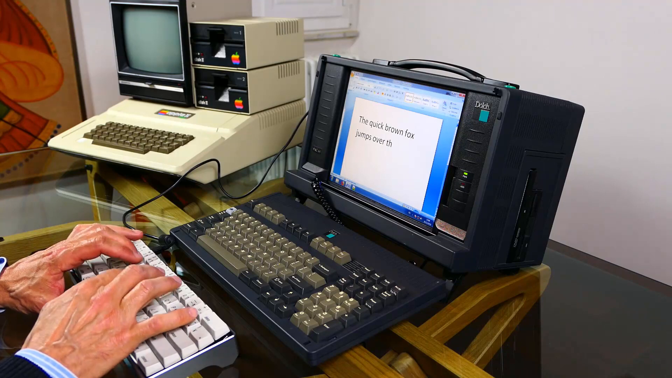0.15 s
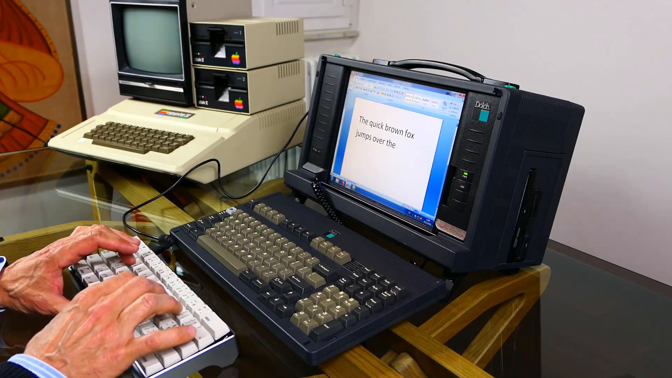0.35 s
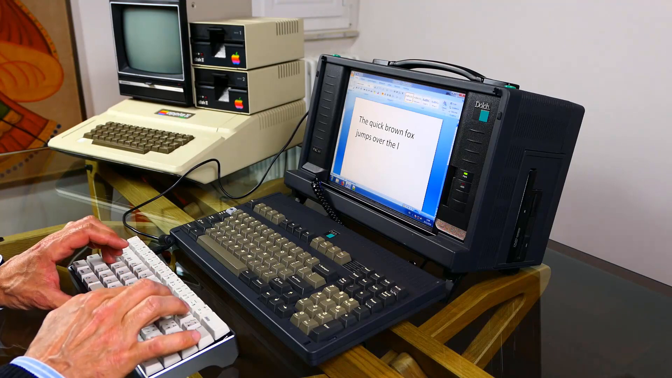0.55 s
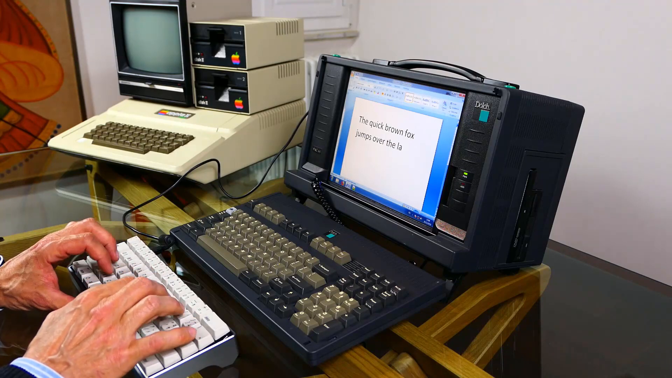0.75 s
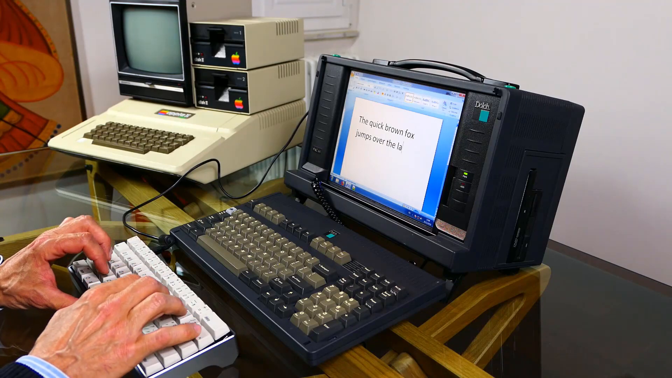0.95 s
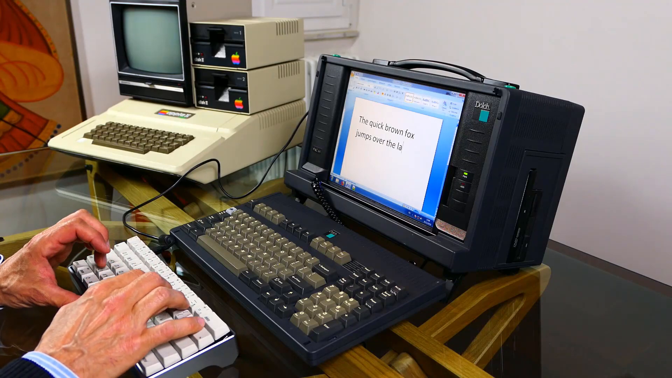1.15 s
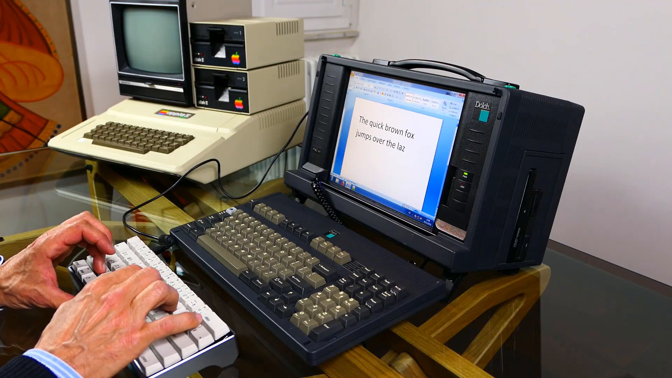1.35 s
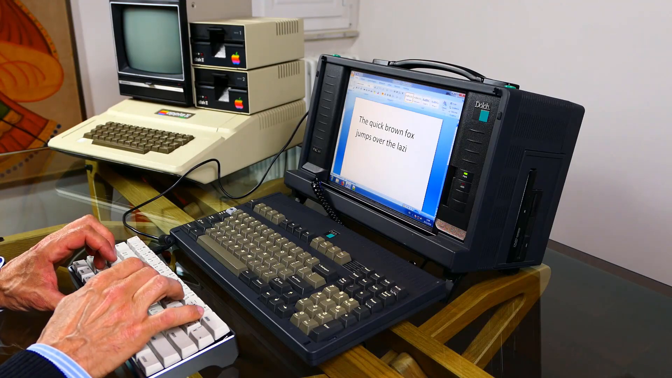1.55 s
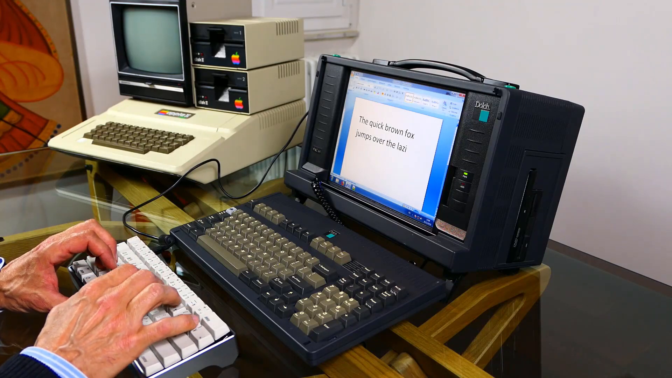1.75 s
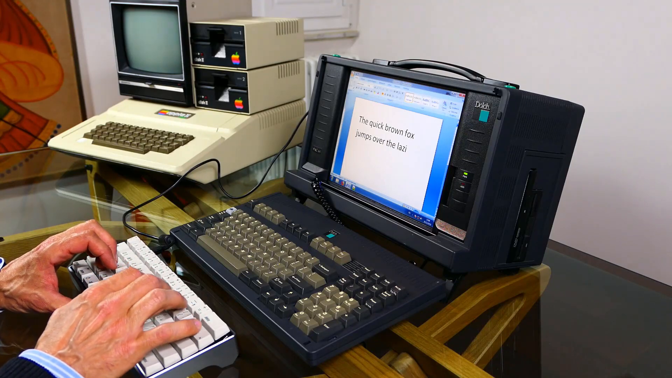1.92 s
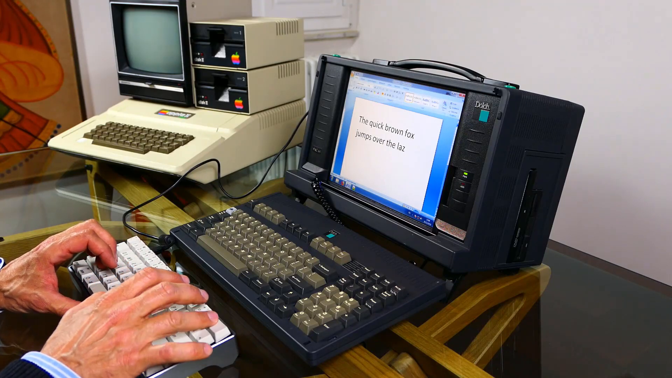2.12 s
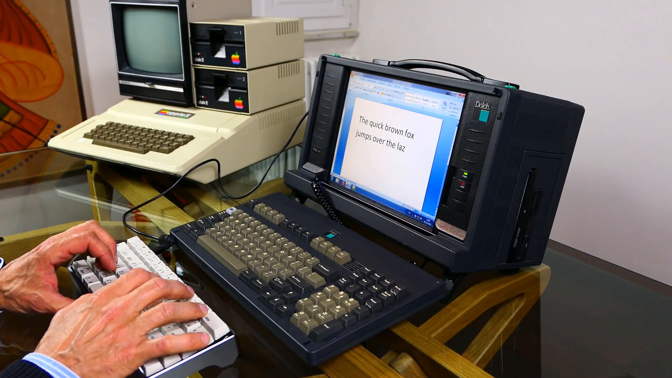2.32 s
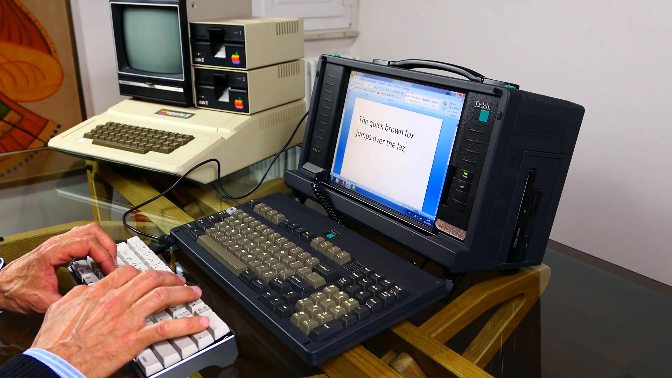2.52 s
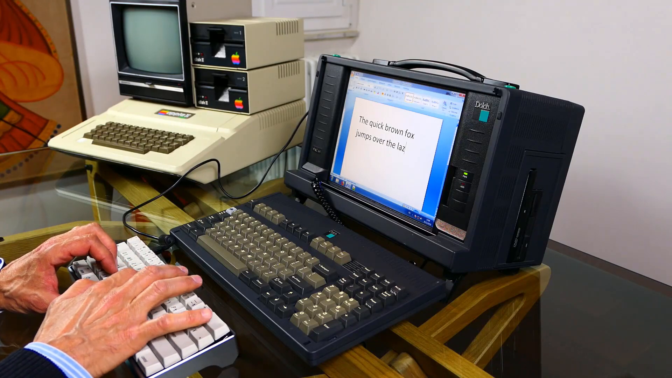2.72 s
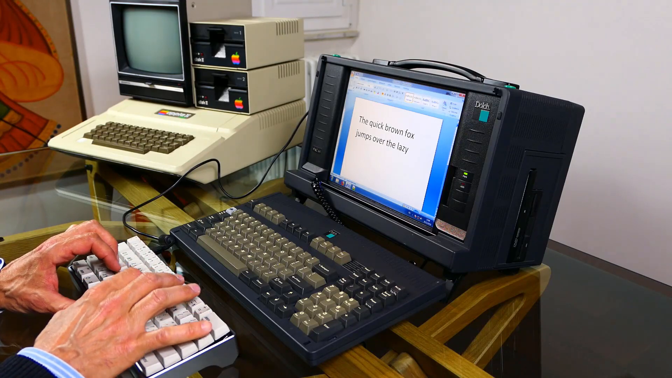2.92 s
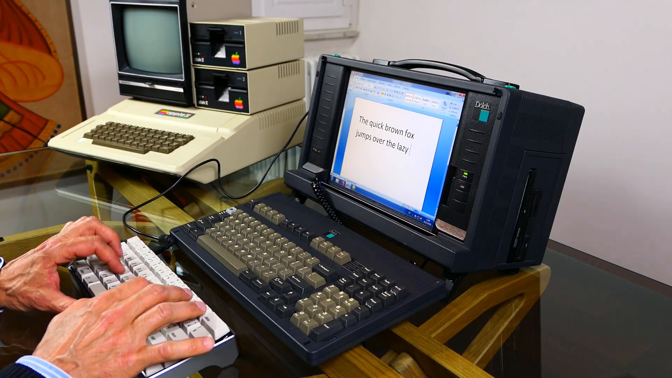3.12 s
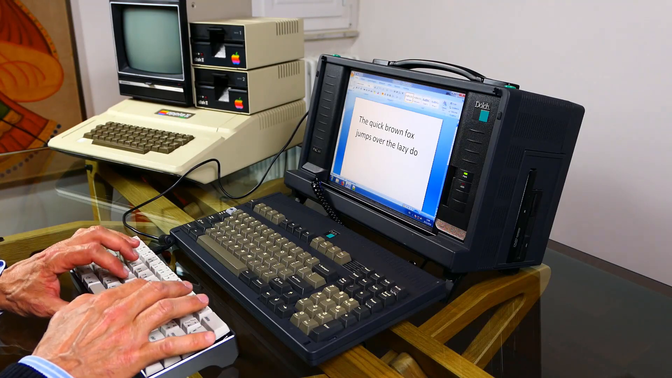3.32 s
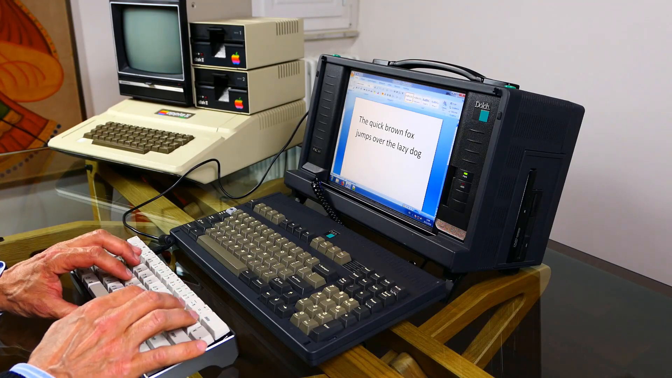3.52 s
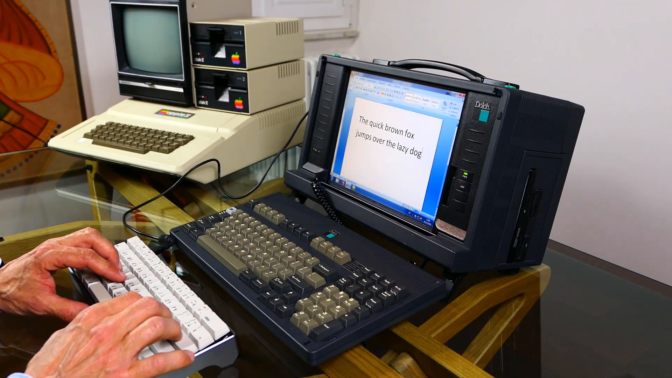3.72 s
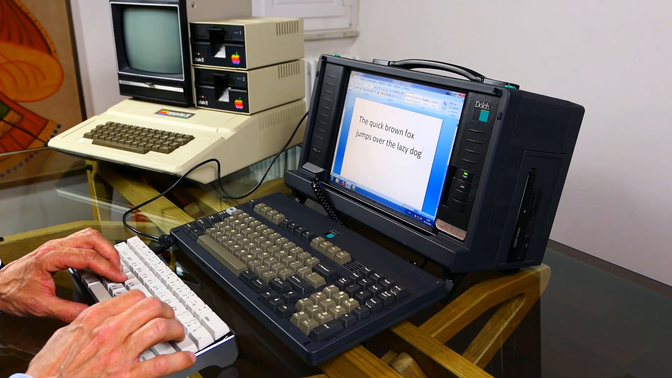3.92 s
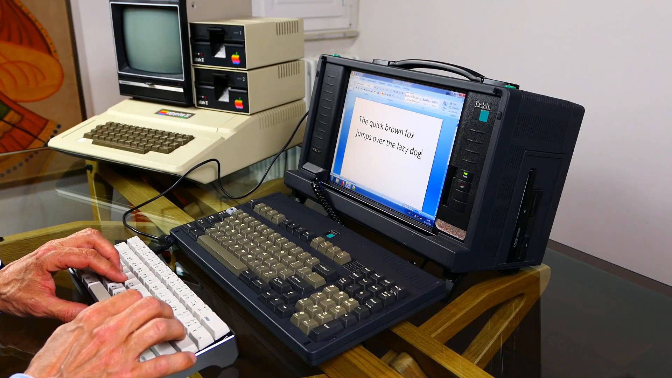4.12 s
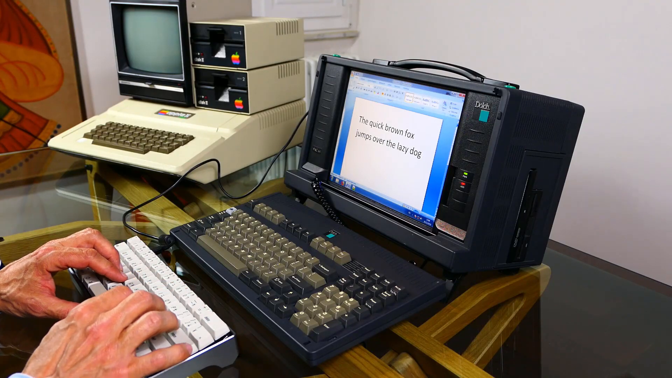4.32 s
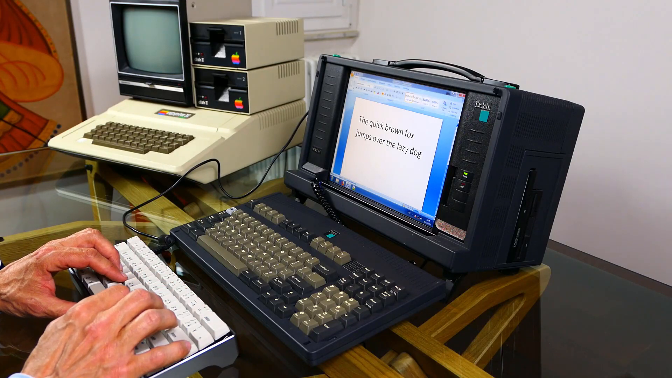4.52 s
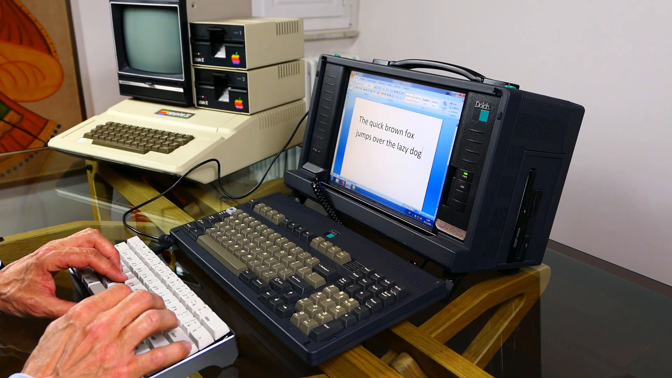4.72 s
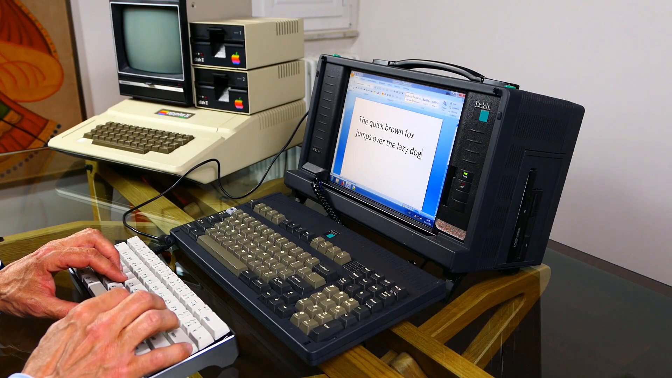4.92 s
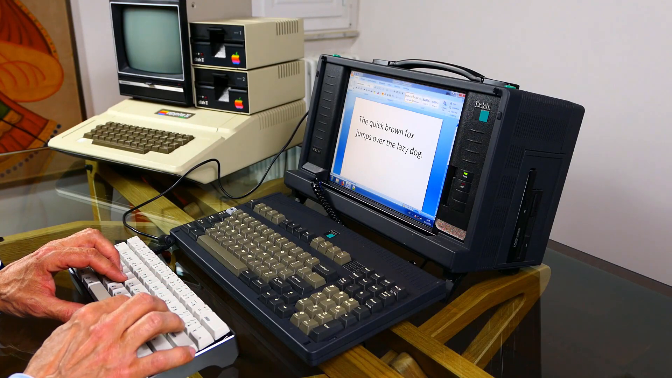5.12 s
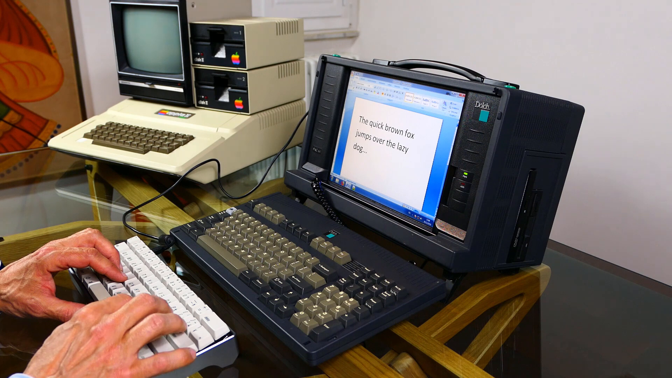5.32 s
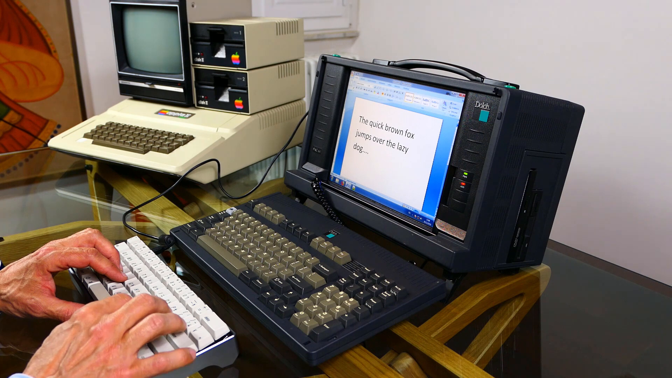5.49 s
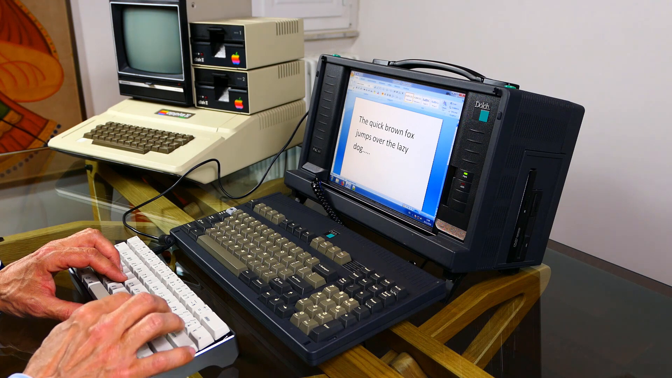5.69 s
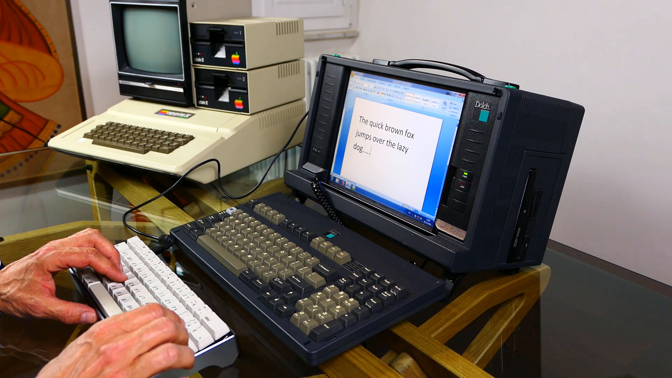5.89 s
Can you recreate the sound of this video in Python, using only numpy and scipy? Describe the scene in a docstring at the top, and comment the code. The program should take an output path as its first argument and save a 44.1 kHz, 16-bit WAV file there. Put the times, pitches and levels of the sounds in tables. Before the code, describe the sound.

A mechanical keyboard is typed on about a metre away, slightly to the left, in a small bare room that adds a short, bright echo. Cooling fans run throughout with a faint, gently pulsing hum and soft air noise. A quick run of crisp clacks fills the first 0.8 seconds, the keys snapping down and springing back. After a short pause, a few sparser strokes come between 1.3 and 1.8 seconds. Near 2.2 seconds the space bar makes a soft, lower knock on the desk, followed by one faint tap. Firmer keystrokes come from about 2.8 to 3.6 seconds. Around 4 seconds fingertips brush very lightly over the keycaps with a tiny click. Only the fans are heard until about 5.1 seconds, when a last run of five keystrokes begins, ending near 5.8 seconds.

```python
"""Typing on a mechanical keyboard a metre away in a small bare room. From the start two cooling fans hum
and beat over their air noise. In a quick opening run each key snaps, bottoms out or springs back; the
impacts ring the modes of cap, plate and case, and the walls return a short bright tail. Sparser strokes
follow, and near 2.2 s the wide bar knocks the desk. After more keys, fingertips brush the caps around
4 s; the fans are then heard alone until a last run begins near 5.1 s."""
import sys
import numpy as np
from scipy import signal
from scipy.fft import rfft, irfft
from scipy.io import wavfile

SR = 44100
rng = np.random.default_rng(int(sys.argv[2]) if len(sys.argv) > 2 else 0)


def inscribe(sig):
    """Save sig as 16-bit PCM at rate SR to the path in sys.argv[1].

    A 1-D sig is mono; a 2-D sig holds one channel per row.
    Samples are clipped to [-1, 1] before scaling.
    """
    pcm = np.round(np.clip(np.atleast_2d(sig).T, -1, 1) * 32767)
    wavfile.write(sys.argv[1], SR, pcm.astype(np.int16))


N = 262395

# Each key typed: (body_hz, cap_hz, spring_hz, air_db, hand_db), hand_db being the direct sound left by
# the hand; then its snap, bottoming and returns: (start_s, stem_db, body_db, cap_db, spring_db)
KEYSTROKES = [((1970, 3400, 7500, 1, -1.5), [(.0034, -26.5, -26.5, -33.5, -48)]),
              ((2160, 3499, 7500, -3.5, 2.5), [(.0588, -19, -36.5, -26.5, -39.5),
              (.0637, -23, -36, -29, -42)]), ((2035, 4230, 7100, 1.5, -.4),
              [(.1783, -14.5, -29.5, -31, -36.5), (.1838, -22, -35.5, -28.5, -42),
              (.1924, -17.5, -34, -29, -32), (.197, -19, -29.5, -28.5, -46)]), ((2398, 4280, 7670, -1, .4),
              [(.2942, -26.5, -33, -34, -30.5), (.2982, -24, -32, -34, -44)]), ((1920, 4260, 8000, 5, -3),
              [(.417, -37, -43, -40, -56), (.434, -44, -48, -43.5, -60), (.5246, -29, -34.5, -39, -46)]),
              ((2540, 3500, 6700, 6, 1), [(.5619, -20, -40, -23, -33.5), (.5651, -21, -31.5, -27.5, -33)]),
              ((2620, 4300, 7450, 1.4, 2), [(.6659, -24.5, -31.5, -31, -43.5),
              (.6704, -36, -40.5, -35, -40)]), ((2100, 2980, 7300, 3, 1.5), [(.7051, -31, -44, -37, -52),
              (.7776, -40, -45.5, -59, -66), (.8081, -37.5, -61, -54, -60), (.8243, -48, -52, -42.5, -69)]),
              ((1925, 3000, 6950, -6, -2), [(1.3193, -26.5, -40.5, -35.5, -56)]),
              ((1920, 4250, 6920, 2.3, 1.5), [(1.4146, -35, -44.5, -32.5, -48.5)]),
              ((1940, 3450, 6920, 3.8, .4), [(1.4597, -43, -49, -40.5, -51)]), ((2080, 3570, 7500, -12, 2),
              [(1.6076, -15.5, -35, -35, -37.5), (1.6124, -30, -38.5, -35, -47),
              (1.6955, -31, -48.5, -38, -52), (1.7727, -45, -60, -55, -75)]),
              ((2100, 3998, 7600, 7.5, -0.5), [(2.1542, -43, -59, -52, -59), (2.1706, -30, -45, -36, -60),
              (2.2842, -47, -54.5, -59, -57)]), ((2300, 3480, 6880, 8, .4), [(2.456, -50, -63, -49, -65)]),
              ((2350, 4280, 7500, 0, -0.5), [(2.833, -12.5, -32.5, -29, -35.5),
              (2.9345, -25, -36, -35.5, -46)]), ((2184, 3450, 7750, 10, -1.5),
              [(3.0968, -35.5, -43, -48, -54.5)]), ((2600, 4280, 6800, 1.5, 1.8),
              [(3.2493, -16.5, -33, -27, -40.5), (3.2532, -16, -38.5, -30.5, -40)]),
              ((1957, 3600, 6687, -6.5, 1), [(3.3472, -17, -32, -29.5, -27.5),
              (3.3554, -38, -28.5, -29, -48), (3.4272, -31, -36.5, -34.5, -36.5)]),
              ((2018, 4171, 6900, 4, -2.5), [(3.5018, -13.5, -23.5, -22, -33),
              (3.5961, -32.5, -37.5, -38, -41)]), ((2350, 4260, 6100, 6, 2.6),
              [(3.8634, -45, -56, -53.5, -66)]), ((2350, 4300, 7000, -3.5, 0),
              [(5.0774, -28, -33, -33.5, -35.5), (5.0954, -31, -36, -41, -43)]),
              ((2227, 3480, 6800, -1, -3.5), [(5.221, -36, -33.5, -36, -46), (5.2254, -30, -48, -51, -42),
              (5.3093, -41, -44, -45.5, -53)]), ((2167, 3480, 6900, -2.5, -4),
              [(5.3807, -31, -33.5, -34, -43), (5.463, -38.5, -48, -38, -47)]), ((2462, 3500, 7100, 2, -3),
              [(5.5468, -24, -34.5, -26, -35.5), (5.6293, -45, -36.5, -37.5, -38)]),
              ((2380, 3500, 7000, 4, .4), [(5.7224, -24, -28.5, -30.5, -42.5),
              (5.7269, -20, -29.5, -27.5, -34), (5.8035, -47, -38, -39, -46.5)])]
# Modes of the keyboard's parts and of the airy top treble: pitch_hz, level_db, t60_s
STEM_MODES = [(5010, 2, 0.011), (5436, -1.5, 0.01), (6013, -2, 0.0067)]
CASE_MODES = [(1600, 3.5, 0.0051), (1829, -0.5, 0.017), (1927, -1, 0.039)]
WALL_MODES = [(2195, 3.1, 0.021), (2443, 3.4, 0.02), (2607, 6.6, 0.014)]
PLATE_MODES = [(2987, 1.5, 0.017), (3460, 2.5, 0.021)]
CAP_TOP_MODES = [(4031, 4, 0.01), (4272, 7.2, 0.01)]
AIR_MODES = [(8350, 13.6, 0.0044), (9520, 12, 0.0043), (10800, 12.2, 0.0032), (13100, 11.4, 0.0024),
             (14800, 7.6, 0.0015)]
# Modes of the spring: pitch_ratio, level_db, t60_s
SPRING_MODES = [(1, 10.3, 0.0094), (.93, 9.2, 0.0085)]
# Loose rattle, longer after a soft stroke: stem_db, decay_s, rattle_db
RATTLE_BY_FORCE = [(-45, .008, 2), (-15, .005, -7)]
# Direct sound, stronger for a firm stroke: stem_db, direct_db
DIRECT_BY_FORCE = [(-52, -0.8), (-20.5, -0.55), (-25.5, 1)]
# Scrape of the stem in its guide, weaker before a firm stroke: stem_db, scrape_db
SCRAPE_BY_FORCE = [(-40, -10), (-15, -19)]
# The wide bar knocking the desk: start_s, pitch_hz, level_db, t60_s
DESK_KNOCKS = [(2.173, 555, -27, 0.027), (2.283, 626, -35, 0.086)]
# Fingertips brushing the caps: start_s, end_s, ring_hz
FINGER_BRUSH = (3.72, 4.14, 5000)
# Reverberation bands: centre_hz, t60_s, level_db
ROOM_BANDS = [(590, 0.25, -3), (1410, 0.27, 6.5), (2170, 0.34, 4), (4800, 0.28, -0.5), (7800, 0.25, 5),
              (12600, 0.18, 8)]
# Shaft and blade tones: pitch_hz, left_db, right_db, right_lag_rad
FAN_TONES = [(167.28, -67.5, -67.5, .96), (376.38, -63, -63.5, 0), (501.85, -56.8, -56, 0),
             (511.02, -56.9, -60, .66)]
# Spectral shape of the fans' air noise: frequency_hz, relative_density_db
AIRFLOW_SPECTRUM = [(15, -68), (25, -36.5), (133, -22.5), (156, -12), (267, -4), (458, -9), (497, -4.5),
                    (744, -16.5), (807, -18), (2020, -27.5), (3100, -34.5), (5310, -33), (15600, -41)]
# Stereo width of the reverberation and of the air noise: frequency_hz, side_minus_mid_db
ROOM_WIDTH = [(1500, -5), (4500, -8.5), (12000, -8)]
AIRFLOW_WIDTH = [(30, 1), (80, 9), (250, 0), (500, -1), (1500, 2), (4400, -3), (12000, -5)]

SPOTS = 6  # places on the keyboard with their own reflections
CONTACT_RISE_S, SCRAPE_RISE_S = 0.00039, 0.0065
RADIATION_CUTOFF_HZ, TOP_HZ = 1296, 15900
PLATE_DB = -3.5  # relative to the cap top
FAVOUR_DB, FAVOUR_OCTAVES = 5.5, 0.03
AIR_DB, AIR_GROWTH = -41.5, 1.09  # for stem and spring at -25 dB; dB gained per dB of stroke
KEYS_PAN_DB, AIRFLOW_DB = 1, -50.5
IN_STEP_S = 3.017  # the two blade tones swell together here


def keys():
    """Impact excitation: modes convolved with the contact force. Row 0 is direct; the rest feed the room."""
    strokes = [impact + key for key, impacts in KEYSTROKES for impact in impacts]
    out, t = np.zeros((SPOTS + 1, N)), np.arange(3072) / SR
    scatter = rng.standard_normal((len(strokes), 2, 24))
    grit = rng.standard_normal((len(strokes), 3, len(t)))
    firm_db, rattle_s, rattle_db = np.transpose(RATTLE_BY_FORCE)
    for i, (start_s, stem_db, *parts, hand_db) in enumerate(strokes):
        ringing = ring(stroke_modes(stem_db, *parts), t, scatter[i])
        add(out[1 + i % SPOTS], start_s, ringing)
        # one blow, then sparse re-contacts that die away
        strength, chance, friction = grit[i]
        force = strength * (chance > 1.3) * np.exp(-t / np.interp(stem_db, firm_db, rattle_s))
        force *= undb(np.interp(stem_db, firm_db, rattle_db)) / np.sqrt(np.sum(force ** 2))
        force[0] = 1
        direct_gain = undb(hand_db + np.interp(stem_db, *np.transpose(DIRECT_BY_FORCE)))
        add(out[0], start_s, direct_gain * signal.fftconvolve(ringing, force))
        # the stem's scrape swells until it lands
        scrape = friction * np.exp(-t[::-1] / SCRAPE_RISE_S) / np.sqrt(SCRAPE_RISE_S * SR / 2)
        scrape_gain = undb(np.interp(stem_db, *np.transpose(SCRAPE_BY_FORCE)))
        add(out[0], start_s - len(t) / SR, scrape_gain * signal.fftconvolve(ringing, scrape))
    # parts this small radiate no bass
    return signal.sosfilt(signal.butter(6, RADIATION_CUTOFF_HZ, "high", fs=SR, output="sos"), out)


def stroke_modes(stem_db, body_db, cap_db, spring_db, body_hz, cap_hz, spring_hz, air_db):
    """Superposition: a stroke rings the modes of all parts at once, each part at its own level."""
    plate = [(hz, db + PLATE_DB, t60) for hz, db, t60 in PLATE_MODES]
    body = favour(CASE_MODES + WALL_MODES, body_hz, db_per_octave2=38)
    cap = favour(plate + CAP_TOP_MODES, cap_hz, db_per_octave2=5)
    spring = [(ratio * spring_hz, db, t60) for ratio, db, t60 in SPRING_MODES]
    air_db = air_db + AIR_DB + AIR_GROWTH * ((stem_db + spring_db) / 2 + 25)
    parts = [(STEM_MODES, stem_db), (body, body_db), (cap, cap_db),
             (spring, spring_db), (AIR_MODES, air_db)]
    return [(hz, part_db + db, t60) for modes, part_db in parts for hz, db, t60 in modes]


def favour(modes, own_hz, db_per_octave2):
    """Selective excitation: a key lifts modes at its own pitch; others fall with the interval squared."""
    hz, db, t60 = np.transpose(modes)
    octaves = np.log2(hz / own_hz)
    lift_db = FAVOUR_DB * np.exp(-(octaves / FAVOUR_OCTAVES) ** 2)
    return list(zip(hz, db + lift_db - db_per_octave2 * octaves ** 2, t60))


def ring(modes, t, scatter):
    """Damped vibration: a finite contact builds up decaying sines, scattered in pitch and strength."""
    hz, db, t60 = np.transpose(modes)[:, :, None]
    hz = hz * (1 + .007 * scatter[0, :len(hz), None])
    db = db + 1.5 * scatter[1, :len(hz), None]
    onset = (1 - np.exp(-t / CONTACT_RISE_S)) ** 2
    return np.sum(undb(db - 60 * t / t60) * np.sin(2 * np.pi * hz * t), axis=0) * onset


def desk_knocks():
    """Free vibration: each knock of the wide bar rings one low, damped mode of the desk."""
    out, t = np.zeros(N), np.arange(8192) / SR
    onset = 1 - np.exp(-t / 0.00074)
    for start_s, hz, db, t60 in DESK_KNOCKS:
        add(out, start_s, undb(db - 60 * t / t60) * np.sin(2 * np.pi * hz * t) * onset)
    return out


def finger_brush(gain_db=-59):
    """Friction noise: fingertips sliding over the caps drive the resonance of the stems."""
    start_s, end_s, ring_hz = FINGER_BRUSH
    progress = np.clip((np.arange(N) / SR - start_s) / (end_s - start_s), 0, 1)
    grit = rng.standard_normal(N) * np.sin(np.pi * progress) ** .5
    narrow = signal.lfilter(*signal.iirpeak(ring_hz, Q=20, fs=SR), grit)
    broad = signal.lfilter(*signal.iirpeak(ring_hz, Q=1.5, fs=SR), grit)
    return undb(gain_db) * (3 * narrow + broad)


def room(source, build_s=.004):
    """Reverberation: reflections fill in, then decay band by band, mostly alike left and right."""
    t = np.arange(SR // 2) / SR
    hz = np.fft.rfftfreq(len(t), 1 / SR)
    noise, tail = rfft(rng.standard_normal((2, len(t)))), 0
    noise[1] *= undb(on_log(ROOM_WIDTH, hz))
    for k, (_, t60, db) in enumerate(ROOM_BANDS):
        share = on_log([(band[0], j == k) for j, band in enumerate(ROOM_BANDS)], hz)
        fade = undb(-60 * t / t60) * (1 - np.exp(-t / build_s))
        fade /= np.sqrt(np.sum(fade ** 2))  # unit energy
        tail = tail + undb(db) * irfft(noise * share, len(t)) * fade
    mid, side = signal.fftconvolve(source[None], tail, axes=1)[:, :N]
    return stereo(mid, side)


def fans():
    """Beating: tones of two fans at slightly different speeds interfere, over broad air noise."""
    t, tones = np.arange(N) / SR - IN_STEP_S, 0
    for pitch_hz, left_db, right_db, lag_rad in FAN_TONES:
        phase = 2 * np.pi * pitch_hz * t + np.array([[lag_rad], [-lag_rad]]) / 2
        tones = tones + np.sqrt(2) * undb([[left_db], [right_db]]) * np.cos(phase)
    hz = np.fft.rfftfreq(N, 1 / SR)
    mid_spectrum, side_spectrum = rfft(rng.standard_normal((2, N))) * undb(on_log(AIRFLOW_SPECTRUM, hz))
    mid = irfft(mid_spectrum, N)
    side = irfft(side_spectrum * undb(on_log(AIRFLOW_WIDTH, hz)), N)
    return tones + stereo(mid, side) * undb(AIRFLOW_DB) / np.std(mid)


def undb(db):
    """Decibels as an amplitude ratio."""
    return 10 ** (np.asarray(db) / 20)


def on_log(table, hz):
    """Interpolation on a log-frequency axis."""
    table_hz, values = np.transpose(table)
    return np.interp(np.log(np.maximum(hz, 1)), np.log(table_hz), values)


def add(track, start_s, sound):
    """Superposition of a sound on a track from start_s."""
    i = int(start_s * SR)
    track[max(i, 0):i + len(sound)] += sound[max(-i, 0):N - i]


def stereo(mid, side):
    """Sum and difference give left and right."""
    return np.array([mid + side, mid - side])


def scene():
    """Direct and reflected sound add: the keyboard a little to the left in its room, over the fans."""
    direct, *spots = keys()
    desk = desk_knocks()
    typing = direct + desk + finger_brush() + sum(room(source) for source in spots + [desk])
    return typing * undb([[KEYS_PAN_DB / 2], [-KEYS_PAN_DB / 2]]) + fans()


def record(dry):
    """Band limiting: a steep low-pass filter cuts the top treble."""
    return signal.sosfilt(signal.ellip(10, .2, 70, TOP_HZ, fs=SR, output="sos"), dry)


dry = scene()
out = record(dry)
inscribe(out)
```